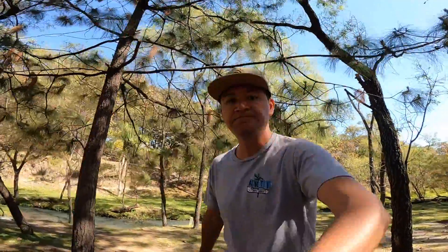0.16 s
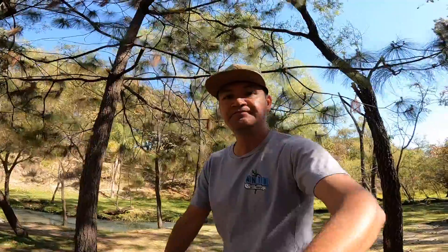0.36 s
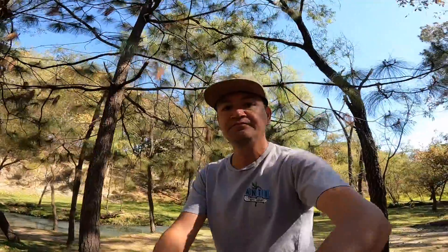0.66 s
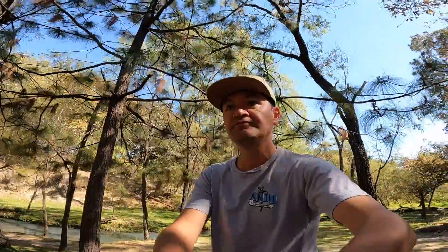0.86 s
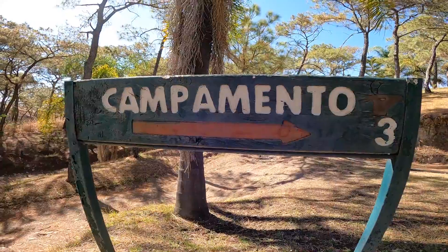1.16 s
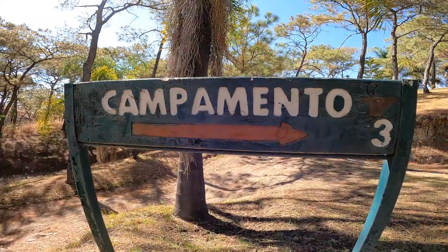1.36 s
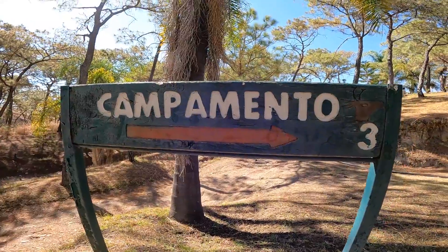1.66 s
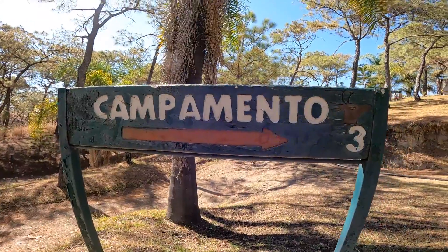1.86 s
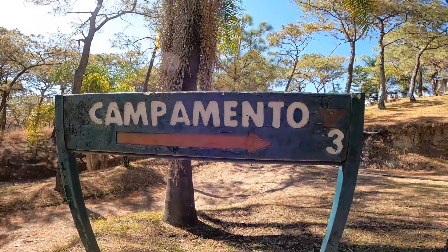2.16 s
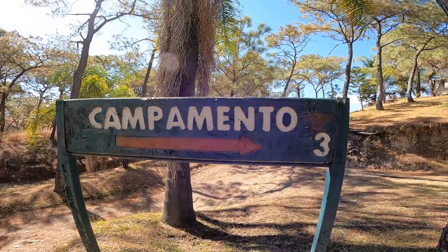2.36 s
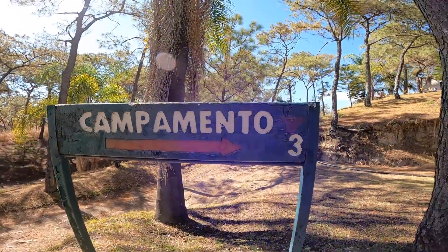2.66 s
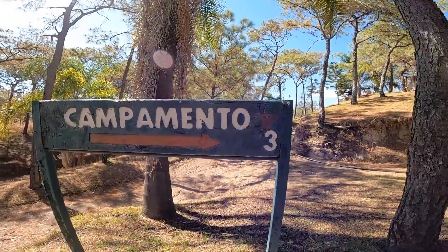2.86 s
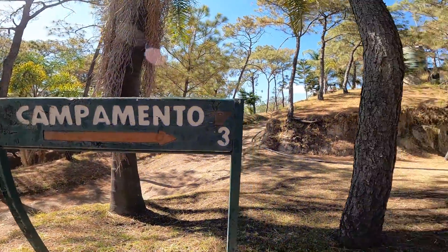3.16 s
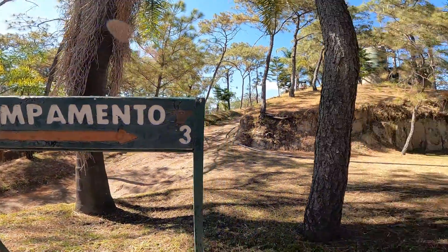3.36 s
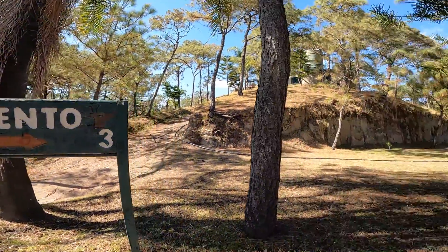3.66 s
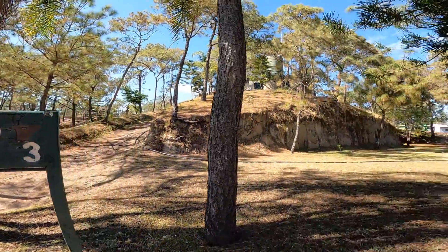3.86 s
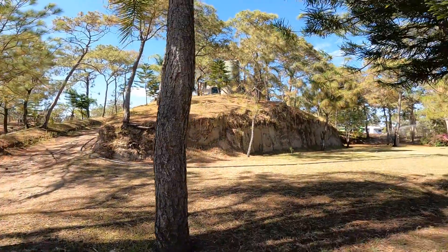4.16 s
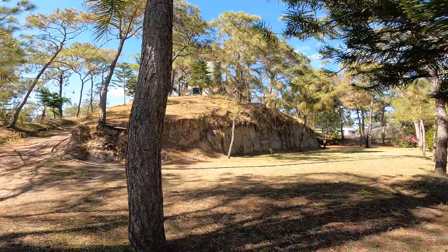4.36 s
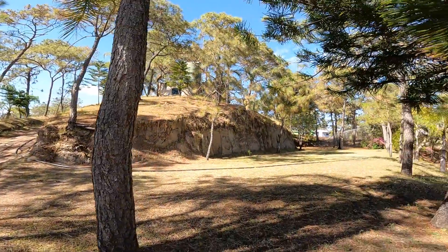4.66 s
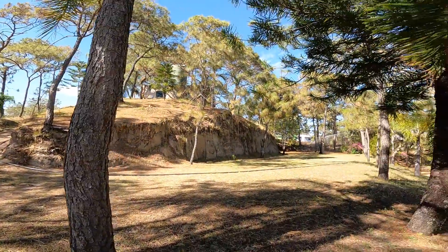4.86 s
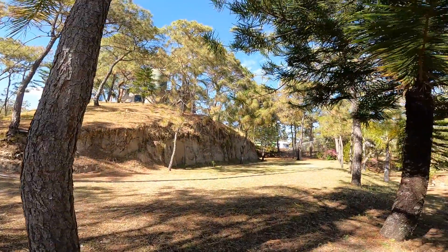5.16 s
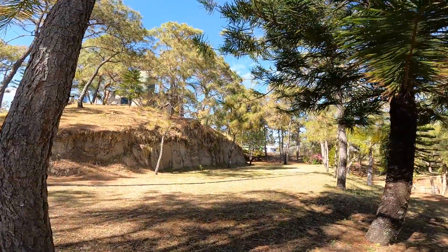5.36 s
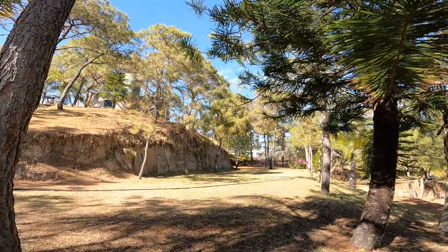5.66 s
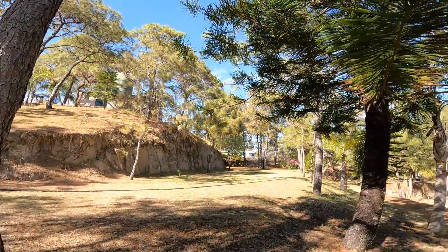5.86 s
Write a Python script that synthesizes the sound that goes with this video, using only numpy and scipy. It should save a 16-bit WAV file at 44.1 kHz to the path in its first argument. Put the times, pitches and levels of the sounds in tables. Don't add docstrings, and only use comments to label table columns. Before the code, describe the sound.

Loud, close pump engine first: fast buzzing chug, valve puffs, rattling thin metal and water hiss, brighter on the left. A sharp cut leaves a fraction of a second empty. Then a much quieter view among pines: soft nearly mono wind that peaks early and fades, a dull far pump throb, tiny high whistles from a bird, and crisp leaf ticks near the end.

```python
import sys
import numpy as np
from scipy import signal
from scipy.fft import rfft, irfft, next_fast_len
from scipy.io import wavfile
from scipy.ndimage import uniform_filter1d, map_coordinates

SR = 44100
rng = np.random.default_rng(int(sys.argv[2]) if len(sys.argv) > 2 else 0)


def master_out(mix):
    frames = np.transpose(np.atleast_2d(mix))
    ceiling = np.clip(frames, -1, 1)
    pcm = np.round(ceiling * 32767).astype(np.int16)
    wavfile.write(sys.argv[1], SR, pcm)


def makeup_ratio(level_db):
    decades = np.asarray(level_db, float) / 20
    return 10 ** decades


N = 264952

# frequency_hz, likeness (0-1)
ALIKE = [(60, 0.99), (180, 0.97), (520, 0.97), (1520, 0.75), (4470, 0.8), (13200, 0.16)]
FAR_SHOT_S = 1.088


def unit(x):
    return x / np.sqrt(np.mean(x ** 2) + 1e-20)


def along(points, hz):
    f, v = np.transpose(points)
    return np.interp(np.log(hz + 1), np.log(f + 1), v)


def wobble(rate):
    knots = rng.standard_normal(int(N * rate / SR) + 4)
    return map_coordinates(knots, [np.arange(N) * rate / SR])


def filtered(x, response):
    m = next_fast_len(N + SR // 2)
    return irfft(rfft(x, m) * response(np.fft.rfftfreq(m, 1 / SR)), m)[..., :N]


def modes(table, f):
    total = 0
    for k, (centre, width, db) in enumerate(table):
        damping = 1j * f * width
        total = total + (-1) ** k * makeup_ratio(db) * damping / (centre * centre - f * f + damping + 1e-9)
    return total


def rush(spectrum, alike, patchy_db):
    z = signal.stft(rng.standard_normal((2, N)), nperseg=512)[2]
    field = uniform_filter1d(rng.standard_normal(z.shape[1:]), size=5, axis=0)
    field = uniform_filter1d(field, size=8, axis=1)
    pair = signal.istft(z * makeup_ratio(patchy_db * unit(field)), nperseg=512)[1][:, :N]

    def mid_side(hz):
        turn = np.arccos(np.clip(along(alike, hz), -1, 1)) / 2
        return makeup_ratio(along(spectrum, hz)) * [np.cos(turn), np.sin(turn)]

    mid, side = filtered(pair, mid_side)
    return unit(np.array([mid + side, mid - side]))


def turning(speed, phase):
    s, rate = np.transpose(speed)
    return np.transpose([s, phase + np.cumsum(np.r_[0, rate[:-1] * np.diff(s)])])


def beats(turns, place, db, scatter_db, jitter_s):
    s, done = np.transpose(turns)
    cycles = np.arange(np.ceil(done[0] - place), done[-1] - place) + place
    chance = rng.standard_normal((len(cycles), 2))
    at = np.round((np.interp(cycles, done, s) + jitter_s * chance[:, 0]) * SR).astype(int)
    return np.bincount(at.clip(0, N), makeup_ratio(db + scatter_db * chance[:, 1]), N + 1)[:N]


def thump(turns, strokes, pipe, scatter_db, jitter_s, low_hz, top_hz):
    pulls = -sum(beats(turns, place, db, scatter_db, jitter_s) for place, db in strokes)

    def response(f):
        highpass = f ** 4 / (f ** 4 + low_hz ** 4)
        return modes(pipe, f) * highpass / np.sqrt(1 + (f / top_hz) ** 16)

    running_s = turns[-1][0] - turns[0][0]
    return unit(filtered(pulls, response)) * np.sqrt(running_s * SR / N)


def wind():
    # time_s, strength_db
    treetops = [(1.2, 1), (1.75, .7), (2.4, -3.3), (2.8, -2), (3.5, 1.2), (4.4, -1.7), (5.3, 1.5), (6, 4)]
    # frequency_hz, level_db (per Hz)
    buffet_air = [(3, -32.5), (12, -4), (30, 4), (70, 1), (110, -7), (200, -14), (260, -21), (500, -51),
                  (1500, -100)]
    sough_air = [(60, -80), (150, -30), (260, -3.5), (420, -4.5), (620, -.5), (850, -5.5), (1200, -14),
                 (2000, -53), (5000, -100)]
    needle_air = [(200, -80), (500, -38), (900, -1), (1500, 0.5), (2500, -4.5), (3500, -11), (5000, -20.5),
                  (8000, -49), (12000, -100)]
    hiss_air = [(900, -80), (2000, -29), (3500, -1), (5500, -1.5), (8000, -8.5), (10000, -16), (11500, -32),
                (14000, -70)]
    top_air = [(5000, -80), (8000, -25), (10000, -6), (12500, -4), (13800, -16), (14800, -40),
               (16000, -100)]
    # frequency_hz, likeness (0-1)
    centre = [(30, 1.0), (100, 1.0), (400, 1.0), (5000, 1.0), (9000, 1.0), (13000, 0.35)]
    t = np.arange(N) / SR
    passing_db = 10 * np.exp(-np.maximum(t - 1.34, 0) / 0.62)
    breeze_db = np.interp(t, *np.transpose(treetops))
    gust = 0.51 * wobble(7)
    buffet_db = -49 + .15 * passing_db + 1.9 * wobble(4.16)
    sough_db = -58 + 1.01 * passing_db + gust
    needles_db = -63.3 + .65 * passing_db + .45 * breeze_db + gust
    hiss_db = -72.5 + .05 * passing_db + 1.01 * breeze_db + gust
    top_db = -88.5 - 1.8 * passing_db + .15 * breeze_db + 1.1 * wobble(8)
    air = makeup_ratio(buffet_db) * rush(buffet_air, centre, patchy_db=2.0)
    air += makeup_ratio(sough_db) * rush(sough_air, centre, patchy_db=1.0)
    air += makeup_ratio(needles_db) * rush(needle_air, centre, patchy_db=1.1)
    air += makeup_ratio(hiss_db) * rush(hiss_air, centre, patchy_db=-1.3)
    air += makeup_ratio(top_db) * rush(top_air, centre, patchy_db=2.0)
    return air


def ticks(s, db, hz, cycles):
    t = np.arange(400) / SR
    pitch = hz[:, None]
    envelope = np.exp(-t * pitch / cycles) * np.minimum(t * pitch / 2, 1)
    grain = makeup_ratio(db)[:, None] * np.sin(2 * np.pi * pitch * t) * envelope
    at = np.round(s * SR).astype(int)[:, None] + np.arange(400)
    return np.bincount(at.ravel(), grain.ravel(), N + SR)[:N]


def leaves(count=9000):
    # start_s, peak_db, pitch_hz
    nearest = [(4.9273, -55, 4250), (5.026, -58, 4520), (5.0785, -49, 4000), (5.1753, -57, 3940),
               (5.2147, -47, 4200), (5.2531, -53, 4050), (5.282, -60, 3820), (5.3718, -54, 4250),
               (5.3977, -55, 4400), (5.525, -52, 4220), (5.5848, -53, 4660), (5.6217, -58, 3900),
               (5.6477, -63, 3700), (5.7085, -46, 3660), (5.7749, -50, 3750), (5.814, -42, 3910)]
    when, size, colour = rng.random((count, 3)).T
    pitch_hz = 3600 + 1500 * colour - 2500 * np.maximum(when - .88, 0)
    bed = ticks(when * N / SR, 8 * size ** 3, pitch_hz, cycles=3)
    clear = makeup_ratio(1.5) * ticks(*np.transpose(nearest), cycles=2.5)
    swell = 1 - np.exp(-np.maximum(np.arange(N) / SR - 4.3, 0) / 0.45)
    return swell ** 2 * makeup_ratio(-67.5 + 2.2 * wobble(90)) * unit(bed) + clear


def bird():
    # start_s, length_s, first_hz, last_hz, level_db
    whistles = [
        (1.43, .17, 9600, 11200, -91),
        (1.67, .08, 11200, 11250, -86),
        (1.78, .14, 12000, 12000, -90),
        (1.96, .22, 10750, 8900, -85),
        (4.44, .26, 11900, 11400, -90),
        (4.76, .16, 11000, 9500, -89),
    ]
    bend = 1.8
    song = np.zeros(N)
    for s, length, first_hz, last_hz, db in whistles:
        u = np.clip((np.arange(N) / SR - s) / length, 0, 1)
        curve = bend if last_hz < first_hz else 1 / bend
        hz = first_hz + (last_hz - first_hz) * u ** curve + 110 * wobble(90)
        ends = np.minimum(np.minimum(u, 1 - u) * length / .02, 1)
        song += ends * makeup_ratio(db - 1 + 3 * wobble(28)) * np.sin(2 * np.pi * np.cumsum(hz) / SR)
    return song


def far_pump():
    # place_in_cycle (0-1), level_db
    strokes = [
        (-0.019, 0.1),
        (0.337, -0.3),
        (0.758, -6.7),
    ]
    # centre_hz, width_hz, level_db
    pipe = [(31, 300, -8.2), (160, 117, 0.8), (140, 12, 0.0), (210, 20, -13.4), (186, 69, -2.6)]
    # start_s, cycles_per_s
    speed = [(1, 19.466), (2.053, 19.402), (2.827, 19.596), (3.213, 19.432), (4.373, 19.334),
             (5.533, 19.39), (6.1, 19.39)]
    turns = turning(speed, phase=-.903)
    body = thump(turns, strokes, pipe, scatter_db=.9, jitter_s=.0002, low_hz=35, top_hz=230)
    level_db = -41.3 - .8 * (np.arange(N) / SR - FAR_SHOT_S)
    return makeup_ratio(level_db + 1.2 + .5 * wobble(4)) * body


def valve_puffs(turns):
    # place_in_cycle (0-1), level_db, t60_s
    openings = [
        (.29, 0, .055),
        (.29, -7, .16),
        (.93, -12, .04),
        (.55, -17, .05),
    ]
    # frequency_hz, level_db (per Hz)
    jet = [(200, -60), (500, -16.5), (900, -8.5), (1500, 0), (2700, -3), (4700, -0.5), (7600, -6.5),
           (10200, -23), (11900, -20.5), (13000, -23.5), (14300, -29.5), (15500, -90)]
    t = np.arange(SR // 4) / SR
    gate = np.zeros(N)
    for place, db, t60 in openings:
        puff = makeup_ratio(-60 * t / t60) * (1 - np.exp(-t / 0.0018))
        gate += signal.fftconvolve(beats(turns, place, db, scatter_db=1.2, jitter_s=.0005), puff)[:N]
    return gate * rush(jet, ALIKE, patchy_db=2.6)


def flowing_water():
    # frequency_hz, level_db (per Hz)
    water = [(150, -50), (280, -9), (500, -10), (900, -10.5), (2000, -16), (5000, -19.5), (7600, -22.5),
             (10200, -37), (12000, -36), (14300, -54.5), (15500, -100)]
    return makeup_ratio(-10) * rush(water, ALIKE, patchy_db=1.6)


def tappets(turns):
    # frequency_hz, level_db (per Hz)
    metal = [(5000, -50), (9000, -9.5), (11500, -1), (14300, -7), (15500, -70)]
    t = np.arange(SR // 4) / SR
    taps = sum(beats(turns, place, db, scatter_db=5.5, jitter_s=0.00078)
               for place, db in [(0.85, -1), (.73, -7.5)])
    bursts = signal.fftconvolve(taps, makeup_ratio(-60 * t / 0.013))[:N]
    return makeup_ratio(-18) * bursts * rush(metal, [(9000, 0.28)], patchy_db=2.0)


def rattling_casing(turns, blows, early):
    # centre_hz, width_hz, level_db
    shell = [(730, 35, -3.5), (1004, 14, -0.5), (1470, 250, -7), (2010, 170, -2.5), (3120, 150, -5.5),
             (4660, 150, -8), (5150, 46, -16), (6600, 160, -7), (8000, 69, -11.5), (12000, 660, -28.5)]
    # centre_hz, width_hz, level_db
    knock_modes = [(460, 160, -7), (690, 52, 1.5), (783, 34, -2.5), (968, 20, -0.5), (1257, 20, -9.5)]
    # frequency_hz, gain_db
    mic_top = [(100, 0.5), (12500, 0), (12800, -8), (14300, -10), (15000, -30.5)]
    # frequency_hz, left_minus_right_db
    lean = [(60, -3), (150, 2), (360, 6), (890, 5.5), (2180, 9.5), (5360, 3), (9000, 4), (13200, 13)]
    air = (valve_puffs(turns) + flowing_water()) * makeup_ratio(1.3 * wobble(250))
    air += tappets(turns)
    air = filtered(air, lambda f: 1 + makeup_ratio(-0.5) * np.abs(modes(shell, f)))
    knock = unit(filtered(blows, lambda f: modes(knock_modes, f)))
    knock_db = -10 - 9 * early
    casing = air / air[:, :SR].std() + makeup_ratio(knock_db - 4.5) * knock
    casing = filtered(casing, lambda f: makeup_ratio(along(mic_top, f) + along(lean, f) * [[.5], [-.5]]))
    return casing / casing[:, :SR].mean(axis=0).std()


def near_pump():
    # place_in_cycle (0-1), level_db
    strokes = [
        (-0.061, -0.1),
        (0.325, -7.0),
        (0.707, -14.2),
    ]
    # centre_hz, width_hz, level_db
    pipe = [(34, 12, -9.2), (114, 57, -3.5), (174, 77, -6.1), (216, 12, -7.5), (312, 10, -26.5),
            (372, 14, -34)]
    # frequency_hz, level_db (per Hz)
    churning = [(8, -41), (20, -15), (45, -8.5), (85, -2), (135, -1.5), (195, -4), (240, -9.5), (320, -17),
                (500, -29.5), (1100, -100)]
    # start_s, cycles_per_s
    speed = [(0, 19.535), (1, 19.535)]
    turns = turning(speed, phase=-.612 - 1)
    early = np.exp(-(np.arange(N) / SR / .38) ** 2)
    blows = sum(beats(turns, place, db, scatter_db=1.2, jitter_s=.0001)
                for place, db in [(.3, 0), (.93, -3)])
    body = thump(turns, strokes, pipe, scatter_db=.4, jitter_s=.00008, low_hz=24, top_hz=420)
    churn = makeup_ratio(-16.5) * rush(churning, [(30, .1), (100, .85)], patchy_db=1.5)
    sump = unit(filtered(blows, lambda f: modes([(385, 70, 0)], f) ** 2))
    thump_db = -23.9 - 1.9 * early
    casing_db = -33.6 - .4 * early
    pump = makeup_ratio(thump_db + 1.73) * (body + churn)
    pump += makeup_ratio(-66 + 12 * early) * sump
    return pump + makeup_ratio(casing_db - 0.99) * rattling_casing(turns, blows, early)


def scene():
    t = np.arange(N) / SR
    near = np.clip(1 - (t - .932) / .013, 0, 1)
    far = np.clip((t - FAR_SHOT_S) / .082, 0, 1)
    distance = wind() + leaves() + bird() + far_pump()
    return far ** 1.33 * distance + near * near_pump()


def band_limit(x):
    return signal.sosfilt(signal.butter(12, 14600, fs=SR, output="sos"), x)


def record(dry):
    return band_limit(dry)


dry = scene()
out = record(dry)
master_out(out)
```